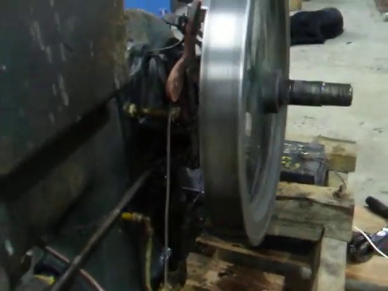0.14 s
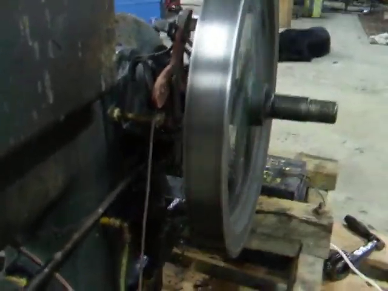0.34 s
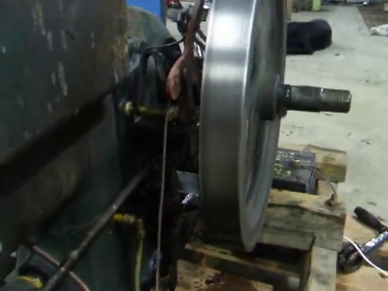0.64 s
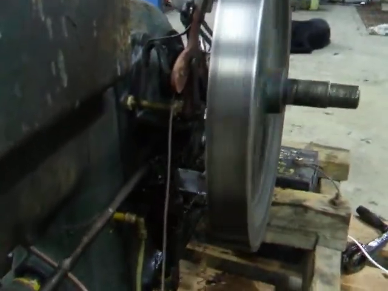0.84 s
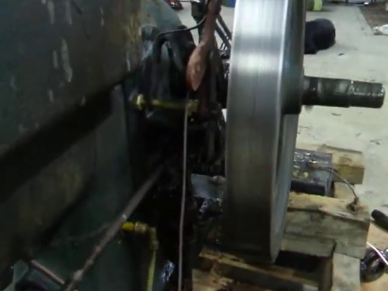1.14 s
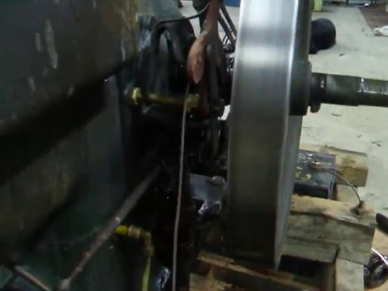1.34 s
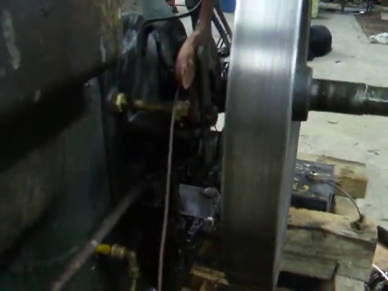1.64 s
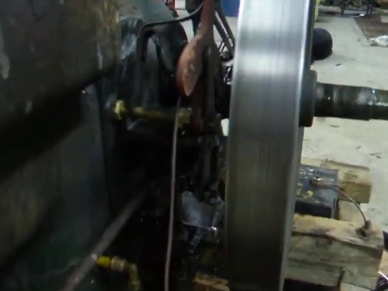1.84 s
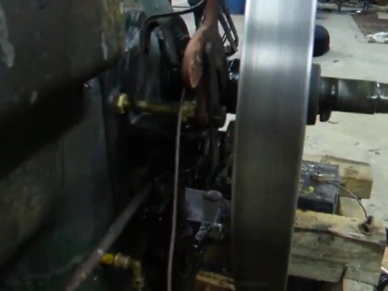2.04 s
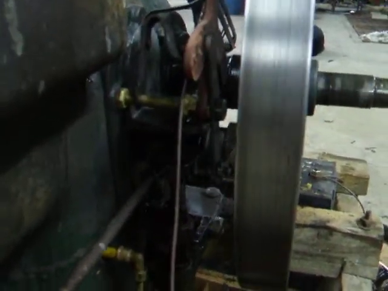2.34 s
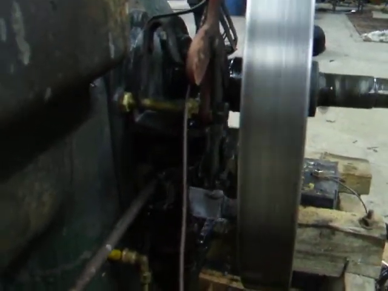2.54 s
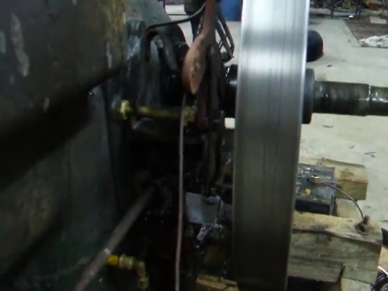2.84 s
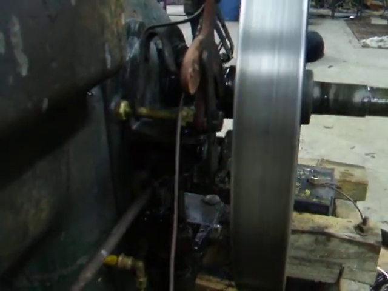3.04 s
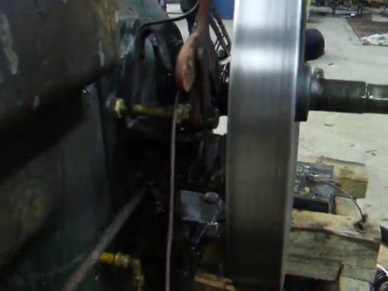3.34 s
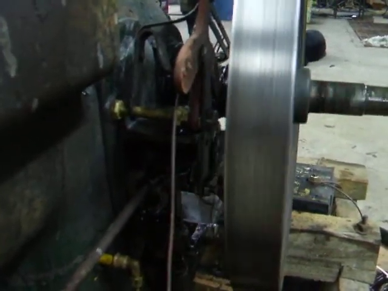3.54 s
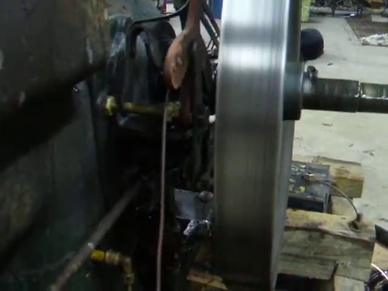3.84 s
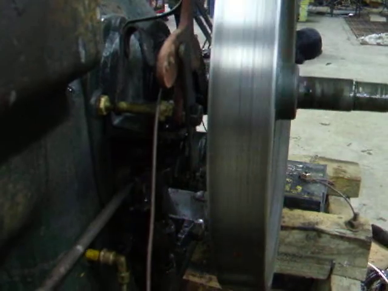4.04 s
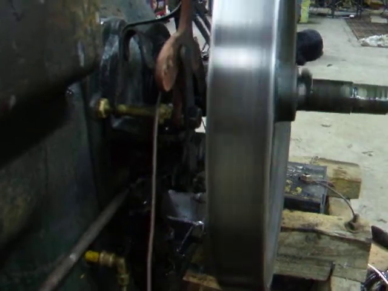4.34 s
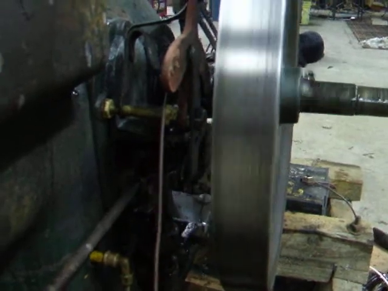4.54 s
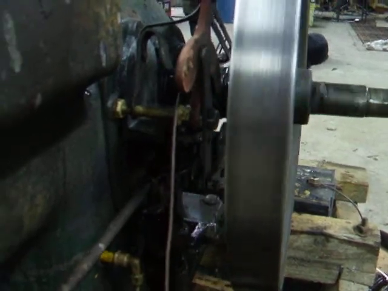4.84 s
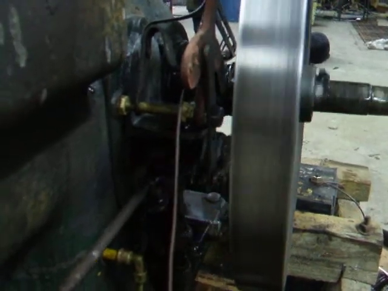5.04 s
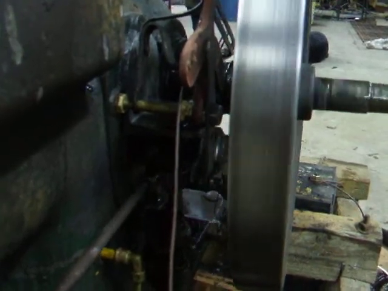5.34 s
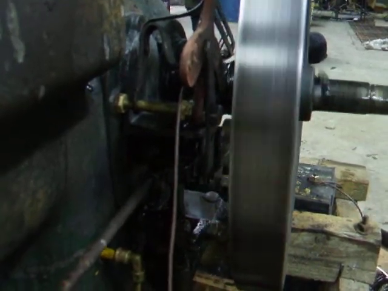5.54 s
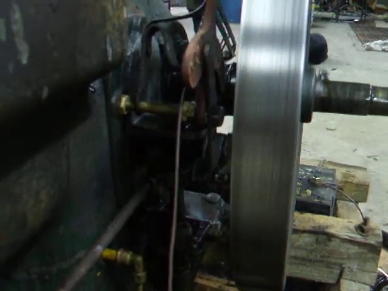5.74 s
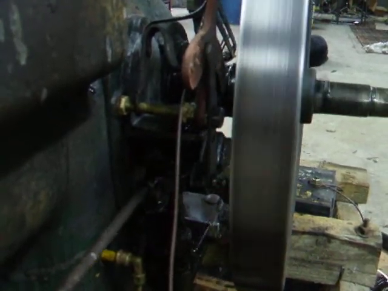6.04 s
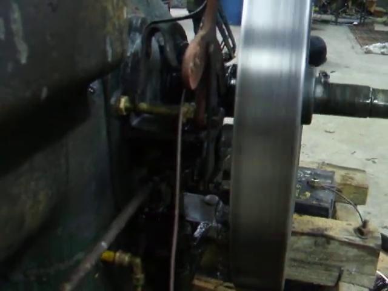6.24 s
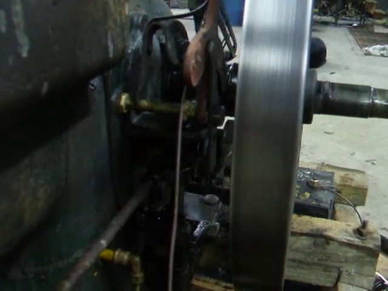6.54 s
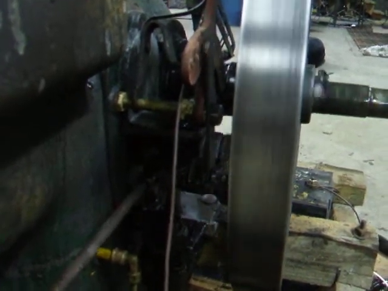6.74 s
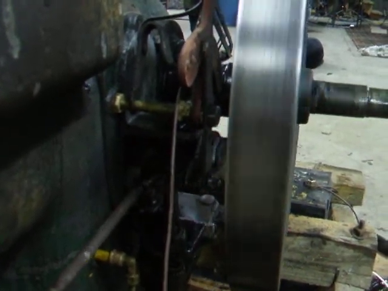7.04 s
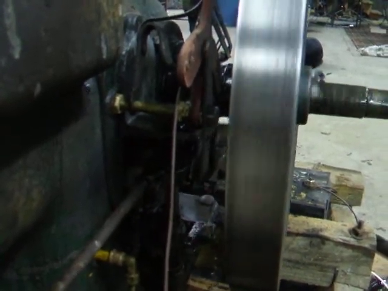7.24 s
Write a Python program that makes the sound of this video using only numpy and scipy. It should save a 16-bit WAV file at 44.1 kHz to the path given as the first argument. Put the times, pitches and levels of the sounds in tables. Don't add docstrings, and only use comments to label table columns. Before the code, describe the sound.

A small old stationary engine idles close by in a workshop, popping exhaust, snapping valves and clicking linkage about three times a second.

```python
import sys
import numpy as np
from scipy import signal
from scipy.fft import rfft, irfft
from scipy.io import wavfile
from scipy.ndimage import uniform_filter1d

SR = 44100
rng = np.random.default_rng(int(sys.argv[2]) if len(sys.argv) > 2 else 0)


def field_ratio(decibels):
    return 10 ** (np.asarray(decibels, dtype=float) / 20)


def to_wav(s):
    ch = np.atleast_2d(s).T
    pcm = np.round(np.clip(ch, -1, 1) * 32767)
    wavfile.write(sys.argv[1], SR, pcm.astype(np.int16))


N = 326340
LEAD = SR // 2
TOP = 0.01


def times(ms):
    return np.arange(round(ms * SR / 1000)) / SR


def train(s, db):
    out = np.zeros(N + 2 * LEAD)
    places = np.round(np.asarray(s) * SR).astype(int) + LEAD
    np.add.at(out, places, field_ratio(np.asarray(db)))
    return out


def strike(clicks, shape):
    return signal.oaconvolve(clicks, shape)[LEAD:LEAD + N]


def varied(db, s):
    spread_db = 1.57
    return db + spread_db * rng.standard_normal(len(s))


def resonate(x, modes, patchy_db=0):
    out = np.zeros(len(x))
    for k, (hz, width, db) in enumerate(modes):
        lump_db = db + patchy_db * rng.uniform(-1.5, 1.5, 2400)
        lumps = np.repeat(field_ratio(lump_db), 140)[:len(x)]
        b, a = signal.iirpeak(hz, hz / width, SR)
        out += (-1) ** k * signal.lfilter(b, a, x * lumps)
    return out


def burst(s, db, part):
    delay, rise, hold, fall, level_db, modes, broad_db, grain_db = part
    ms = times(130) * 1000
    shape = np.clip(ms / rise, 0, 1) ** 2 * np.exp(-np.maximum(ms - rise - hold, 0) / fall)
    rough = np.clip(rng.standard_normal(N // 12 + 1), -2, 2.5)
    grain = np.repeat(field_ratio(grain_db * rough), 12)[:N]
    clumps = np.minimum(rng.exponential(1, N // 80 + 1), 2.5) - 1
    clumps = uniform_filter1d(np.repeat(clumps, 80)[:N], 30)
    grain = grain * field_ratio(1.8 * clumps)
    puff = strike(train(s + delay / 1000, db + level_db), shape) * grain
    puff = puff * np.sign(rng.random(N) - 0.5)
    broad = signal.lfilter(*signal.butter(1, [500, 6000], "band", fs=SR), puff)
    return 3 * resonate(puff, modes, patchy_db=1.24) + field_ratio(broad_db) * broad


def bump(width_ms, tail_ms):
    ms = (times(40) - TOP) * 1000
    return np.exp(-0.5 * (ms / np.where(ms < 0, width_ms, tail_ms)) ** 2)


def ring(hz, t60, rise_ms):
    t = times(350)
    return np.sin(2 * np.pi * hz * t) * field_ratio(-60 * t / t60) * (1 - np.exp(-t * 1000 / rise_ms))


# frequency [Hz], density [dB per Hz].
FLOOR_COLOUR = [(45, -4), (279, -16), (425, -17), (517, -26), (1730, -33), (2440, -31.5), (7210, -36.5),
                (9000, -42)]
# frequency [Hz], width [Hz], level [dB].
GEARS = [(2102, 66, 4.5), (2350, 83, 1.5), (2510, 94, 3), (1330, 34, -1.5)]


def floor():
    hz, db = np.transpose(FLOOR_COLOUR)
    log_hz = np.log(np.fft.rfftfreq(N, 1 / SR) + 1)
    colour = field_ratio(np.interp(log_hz, np.log(hz + 1), db))
    wind = irfft(rfft(rng.standard_normal(N)) * colour, N)
    wind = signal.sosfilt(signal.butter(4, 34, "high", fs=SR, output="sos"), wind)
    hum = resonate(rng.standard_normal(N), GEARS, patchy_db=6.5)
    return field_ratio(-37) * wind / wind.std() + field_ratio(-50.0) * hum / hum.std()


def workshop(x):
    t = times(600)
    tail = rng.standard_normal(len(t)) * field_ratio(-60 * t / 0.3) * (t > 0.004)
    tail = signal.lfilter(*signal.butter(1, [150, 4000], "band", fs=SR), tail)
    return signal.fftconvolve(x, tail / np.linalg.norm(tail))[:N]


# time in seconds [s], level [dB].
TICKS = [(0.1143, -13), (0.4612, -12), (0.8197, -13), (1.166, -13), (1.5141, -4), (1.5261, -19),
         (1.8673, -9), (2.2193, -16), (2.5645, -26), (2.9065, -5), (3.2514, -16), (3.2626, -16),
         (3.594, -20), (3.9363, -22), (4.2715, -8.5), (4.2754, -8), (4.2798, -32), (4.6237, -15.5),
         (5.3134, -19), (5.323, -20), (5.9935, -10), (6.3276, -19), (6.6578, -7.5), (6.9952, -28),
         (7.326, -13.5), (7.3295, -12.5)]


def linkage():
    out, t = np.zeros(N), times(2)
    chatter_lead_s, chatter_s, chatter_db = 0.046, 0.016, (-42, -26)
    starts = np.repeat(np.transpose(INTAKES)[0], repeats=3) - chatter_lead_s
    late, size = rng.random((len(starts), 2)).T
    chatter = zip(starts + chatter_s * late, np.interp(size, (0, 1), chatter_db))
    ticks = list(TICKS) + list(chatter)
    for (s, db), (pitch, turn) in zip(ticks, rng.random((len(ticks), 2))):
        hz = 3500 + 3500 * pitch
        tick = np.sin(2 * np.pi * (hz * t + turn)) * np.exp(-t / 0.00012)
        out[round(s * SR) - 4:][:len(t)] += field_ratio(db - 2) * tick
    return out


# time in seconds [s], level [dB].
GURGLES = [(0.433, -30), (0.776, -47), (1.136, -27), (1.485, -32), (1.838, -26), (2.194, -29.5),
           (2.548, -29), (2.886, -39), (3.218, -35), (3.581, -26.5), (4.248, -26), (4.946, -27),
           (5.636, -27), (6.31, -27), (6.65, -31), (7.321, -31)]
# frequency [Hz], width [Hz], level [dB].
MIXER = [(420, 110, -4), (650, 330, -1), (1100, 160, -5)]
# delay ms, rise ms, hold ms, fall ms, level dB, resonances, broad share dB, grain dB.
FUEL_KNOCK = (-5.5, 2, 1.5, 3.5, -3, MIXER, -18, 1.5)


def gurgle():
    out, t = np.zeros(N), times(24)
    for (s, db), (pitch, echo) in zip(GURGLES, rng.random((len(GURGLES), 2))):
        swell = np.exp(-0.5 * ((t - 0.011) / 0.0032) ** 2)
        blip = field_ratio(db - 1.0) * np.sin(2 * np.pi * (370 + 70 * pitch) * t) * swell
        out[round((s - 0.011) * SR):][:len(t)] += blip
        out[round((s + 0.013) * SR):][:len(t)] += field_ratio(1 - 16.0 * echo) * blip
    return out + burst(*np.transpose(GURGLES), FUEL_KNOCK)


# time in seconds [s], level [dB].
SLAPS = [(0.2267, -2.5), (0.5763, -3), (0.9297, -2.9), (1.282, -0.5), (1.6332, 0.0), (1.984, 2),
         (2.3361, 0), (2.6795, 1.7), (3.0201, 1), (3.3655, 0.5), (3.7024, 1.2), (4.043, 0.1), (4.3882, 0),
         (4.7378, -0.2), (5.0818, -1.5), (5.425, -0.5), (5.765, -1.5), (6.1031, -1), (6.4402, -2),
         (6.776, -1.8), (7.1074, 0.5)]
# time in seconds [s], level [dB].
FLOW = [
    (0, 3.5),
    (2.5, 4),
    (4.6, 3.5),
    (5.2, -0.6),
    (7.4, 3.5),
]
# frequency [Hz], width [Hz], level [dB].
SEAT = [(674, 140, -2), (1285, 93, 1), (1580, 29, -3.5), (2390, 336, 4), (3120, 190, -12), (3950, 360, -2),
        (7400, 110, -20.5)]
# frequency [Hz], width [Hz], level [dB].
LEAK = [(3850, 710, -6.5), (5560, 720, -0.5), (7200, 1700, -5)]
# frequency [Hz], width [Hz], level [dB].
FRAME = [(1300, 98, -24), (2313, 370, -5), (2600, 120, -15), (3950, 47, -6), (5830, 59, -19.5),
         (7700, 72, -15)]
VALVE_SLAP = (-2.4, 1.66, 1.8, 16.8, -24.5, SEAT, 0.89, 4.34)
FLOW_BEFORE = (-41, 13, 24, 4.5, -37, LEAK, -1, 1)
FLOW_AFTER = (6.6, 6.6, 65, 8.8, -28.5, FRAME, -3.5, 3.14)


def valve():
    s, slap_db = np.transpose(SLAPS)
    flow_db = np.interp(s, *np.transpose(FLOW))
    before_db, after_db = varied(flow_db - 2.5, s), varied(flow_db, s)
    pressure = strike(train(s - 0.011, -31.5), ring(51, 0.45, 2.6))
    pressure -= strike(train(s - 0.003, -27.0 + slap_db), bump(0.68, 0.55))
    slap = burst(s, slap_db, VALVE_SLAP)
    hiss = burst(s, before_db, FLOW_BEFORE) + burst(s, after_db, FLOW_AFTER)
    return pressure + slap + hiss


# time in seconds [s], then suction, snap and squeak [dB] over the usual cycle.
INTAKES = [(0.1588, 6.5, 0, -7.5), (0.5065, 7.5, 4.5, -14), (0.857, 7.5, 3.5, -32), (1.2089, 8, 5, -12),
           (1.5612, 6.5, 6, -28), (1.913, 8, 2, -19), (2.265, 8, 6.5, -26), (2.6097, 7.5, 3, -17.5),
           (2.9511, 7.5, 4.5, -13), (3.2966, 7.5, 6, -31), (3.635, 5.5, 1, -18), (3.9745, 8, 0.5, -23),
           (4.3193, 6.5, 2.7, -21), (4.6677, 6, -1.5, -25), (5.0126, 7, 5, -18), (5.3576, 7, 1.2, -21.5),
           (5.696, 5, 1, -17), (6.0337, 6, -0.5, -16), (6.3711, 5.5, -0.5, -19.5), (6.7066, 7.5, -0.5, -19),
           (7.0399, 6.5, -1, -13), (7.3679, 7, 0.5, -23.5)]
# frequency [Hz], width [Hz], level [dB].
LATCH = [(1230, 300, -8.5), (1660, 490, -0.5), (2635, 83, 2.5), (3195, 95, 4.5), (3680, 79, -8),
         (5000, 100, 2.5), (7200, 1100, -10.5)]
# frequency [Hz], width [Hz], level [dB].
SNAP = [(2420, 1700, -15), (4900, 1500, -3.5), (6740, 1200, -1)]
# frequency [Hz], width [Hz], level [dB].
SLIT = [(7620, 690, -0.78), (8040, 1100, -1.3)]
# frequency [Hz], width [Hz], level [dB].
INRUSH = [(606, 350, -8.5), (2450, 450, 6.5), (3950, 570, 0.5), (5300, 860, 0), (7400, 880, -4)]
LATCH_CLICK = (-18, 1.2, 2.6, 5.1, -27, LATCH, 1, 2.3)
LATCH_REBOUND = (-4.5, 0.4, 0.4, 1.2, -30, INRUSH, 3, 2)
VALVE_SNAP = (-1.904, 0.11, 0.1, 3.9, -18.5, SNAP, -2.1, 0.7)
AIR_SQUEAK = (0, 0.2, 1.7, 0.63, 1.7, SLIT, -28.5, 1.5)
AIR_INRUSH = (1.1, 5.1, 5.7, 6.7, -27.5, INRUSH, 3.5, 3.3)


def intake():
    s, suck_db, snap_db, squeak_db = np.transpose(INTAKES)
    latch_db = varied(3.15 - 0.5 * snap_db, s)
    rush_db = varied(-1.2 - 0.45 * snap_db, s)
    top, trip_s = s - TOP, 0.0226
    pressure = -strike(train(top, suck_db - 20.0), bump(0.57, 1.53))
    for trips, db, width_ms in ((1, -17.5, 1.25), (2, -28.5, 2.1)):
        echo = train(top + trips * trip_s, db + 0.2 * suck_db)
        pressure -= strike(echo, bump(width_ms, 1.9 * width_ms))
    pressure += strike(train(s + 0.015, -35), ring(43, 0.66, 4.3))
    latch = burst(s, latch_db, LATCH_CLICK) + burst(s, 0, LATCH_REBOUND)
    air = burst(s, snap_db, VALVE_SNAP) + burst(s, rush_db, AIR_INRUSH)
    squeak = burst(s - 0.0025, squeak_db, AIR_SQUEAK)
    return pressure + latch + air + squeak


SHUT_MS = [58, 58, 57.7, 59.6, 58.2, 56.7, 58.5, 54.7, 56, 57.2, 57.8, 56.2, 56.2, 57.3, 56.7, 57.9, 58.5,
           58, 58.5, 58.1, 56.8, 57.4]
# time in seconds [s], 60 dB decay time [s].
SHUT_T60 = [
    (0, 0.2),
    (1, 0.13),
    (7.4, .1),
]


def closing():
    out = np.zeros(N)
    shut_s = np.transpose(POPS)[0] + np.array(SHUT_MS) / 1000
    shut_db = varied(-23.5, shut_s)
    rings = np.interp(shut_s, *np.transpose(SHUT_T60)) * rng.uniform(0.58, 1.63, len(POPS))
    detune = rng.uniform(0.99, 1.03, (len(POPS), 2))
    for s, db, t60, (pitch, beat) in zip(shut_s, shut_db, rings, detune):
        sound = ring(270 * pitch, t60, 0.2)
        sound += 0.86 * ring(225 * beat, 0.028, 0.23) + 0.48 * ring(330 * beat, 0.067, 0.55)
        sound[850:] += field_ratio(-12.5) * ring(250 * beat, 0.19, 1.0)[:-850]
        part = out[round((s - 0.0011) * SR):][:len(sound)]
        part += field_ratio(db + 0.5) * sound[:len(part)]
    return out + strike(train(shut_s - TOP, shut_db - 4.5), bump(1.0, 0.17))


def pop(s, db, repeat_db):
    top, chamber_s = s - TOP, 0.0037
    crest = field_ratio(-1.5) * bump(0.65, 0.61) + field_ratio(-3.5) * bump(0.062, 0.084)
    out = strike(train(top, db), crest)
    out -= strike(train(top - 0.0022, db - 11), bump(0.83, 0.93))
    out += strike(train(top + chamber_s, db + repeat_db), bump(0.75, 1.05))
    return out + strike(train(s + 1.5 * chamber_s, db - 23), ring(265, 0.049, 0.17))


# time in seconds [s], pop, first and second return [dB], second return's delay [ms].
POPS = [(-.044, -12, -15, -29, 44.5), (0.3014, -10.5, -15.5, -38, 54), (0.65, -12, -13, -35, 41.6),
        (1.0009, -12, -12, -29, 49), (1.3531, -9.5, -13.5, -32, 40.5), (1.7053, -10.5, -9, -33, 40),
        (2.0567, -9, -11, -25, 41), (2.4065, -9, -11.5, -26, 38), (2.7495, -9, -10.5, -29, 38.8),
        (3.0921, -11, -11, -25, 39.7), (3.4361, -8, -11.5, -25, 57), (3.7743, -9.5, -13, -27.3, 33),
        (4.1149, -10.5, -13.3, -24, 40), (4.4606, -9.5, -11, -41, 57), (4.8096, -10, -13, -22.5, 39.9),
        (5.154, -9.5, -11.5, -26.5, 39.4), (5.4967, -9.5, -13, -29, 35), (5.8344, -9.5, -13, -29, 40),
        (6.1732, -10, -12.5, -29, 37), (6.5101, -9.5, -13, -28, 39.6), (6.8438, -10, -11, -31, 42),
        (7.1752, -8.5, -14, -29, 49)]
# frequency [Hz], width [Hz], level [dB].
BLOW = [(776, 240, 2), (2300, 1580, 2.5), (3200, 1970, 1.5), (4080, 290, 1.5), (6000, 310, -34),
        (7810, 1060, 0.5)]
# frequency [Hz], width [Hz], level [dB].
STEM = [(748, 94, -5.5), (1318, 75, 2.5), (1563, 66, -8), (2040, 180, -2.5), (3120, 270, -7.5),
        (3950, 64, -1), (4920, 260, -17)]
CAM_KNOCK = (-31, 2, 1, 3.3, -34, STEM, 2, 3)
FIRST_BLOW = (-18, 3.5, 4.3, 5.9, -27, BLOW, -0.5, 1.4)
POP_HISS = (-1.4, 1.1, 0.6, 1.6, -26.5, BLOW, -2, 3.5)
BLOW_DOWN = (2.7, 6.5, 5.1, 4.8, -35, BLOW, 0.5, 6.3)
ECHO_HISS = (15.95, 2.2, 0.91, 4.1, -27.5, BLOW, -2.6, 3)
BLOW_END = (21, 2.6, 2.6, 17, -27, STEM, 2.6, 4.2)
VALVE_SEATING = (-5.5, 2.7, 2.1, 13.4, -26.5, STEM, 0.1, 3.2)


def exhaust():
    s, first_db, second_db, third_db, third_ms = np.transpose(POPS)
    trip_s = 0.0193
    swing = ring(52, 0.88, 5.5) + 0.55 * ring(120, 0.57, 5.5)
    pressure = strike(train(s - 1.17 * trip_s, -27.0), swing)
    pressure += strike(train(s - 0.93 * trip_s - TOP, -25), bump(1.2, 1.2))
    pressure -= strike(train(s - 0.0105 - TOP, -26), bump(1.5, 4.2))
    pressure += pop(s, first_db, -6.5) + pop(s + trip_s, second_db, -9)
    pressure += pop(s + third_ms / 1000, third_db + 8.0, -0.56)
    blow_db, down_db, seat_db = varied(-1, s), varied(-4, s), varied(-1.3, s)
    knocks = burst(s + np.array(SHUT_MS) / 1000, seat_db, VALVE_SEATING)
    knocks += burst(s, varied(0, s), CAM_KNOCK)
    gas = burst(s, blow_db, FIRST_BLOW) + burst(s, blow_db, POP_HISS)
    for part in (BLOW_DOWN, ECHO_HISS, BLOW_END):
        gas += burst(s, down_db, part)
    return pressure + knocks + gas


# frequency [Hz], width [Hz], level [dB].
CASTING = [(737, 6.3, 0), (1152, 6.2, 7.5), (2170, 19, -9), (2197, 10, 5), (2490, 11, -15), (2650, 5.2, 1),
           (3080, 10, -3.7), (3900, 4, -4.5), (4820, 18, 2.5), (5710, 29, 8)]


def scene():
    engine = linkage() + gurgle() + valve() + intake() + closing() + exhaust()
    mix = floor() + field_ratio(-19.5) * workshop(engine) + resonate(engine, CASTING) + engine
    return mix[None]


def low_pass(x):
    return signal.sosfilt(signal.butter(12, 9230, fs=SR, output="sos"), x)


def record(dry):
    x = signal.lfilter(*signal.butter(1, 12, "high", fs=SR), dry)
    x = 0.62 * np.tanh(x / 0.62)
    x = signal.sosfilt(signal.butter(6, 8200, fs=SR, output="sos"), x)
    treble_limit = signal.firwin(121, 8420, window=("kaiser", 8), fs=SR)
    x = signal.oaconvolve(x, treble_limit[None], "same")
    return low_pass(x - 0.0025)


dry = scene()
out = record(dry)
to_wav(out)
```